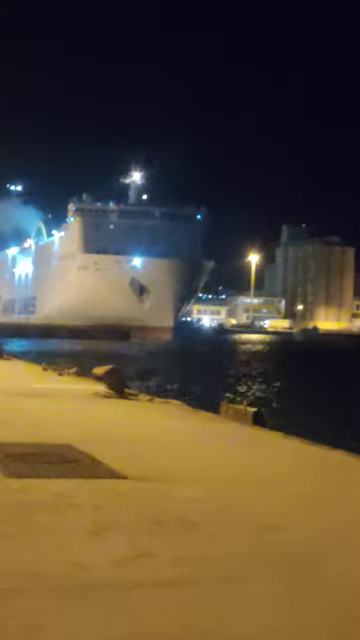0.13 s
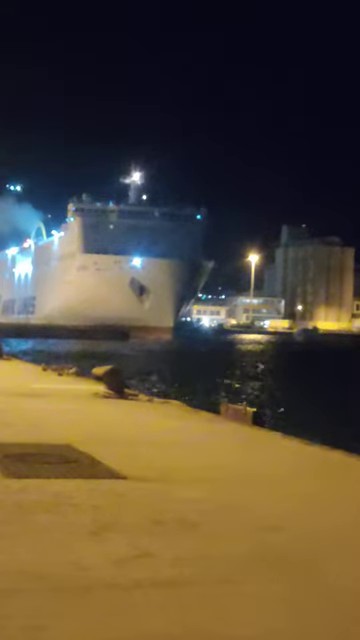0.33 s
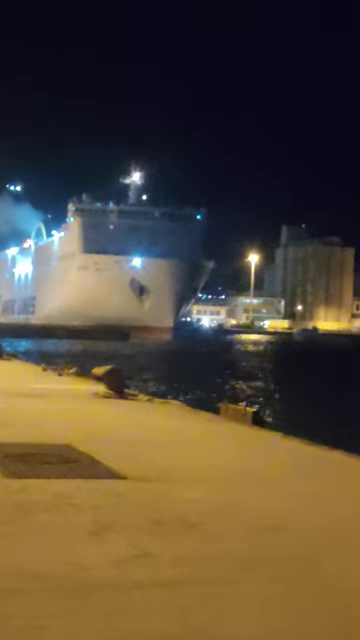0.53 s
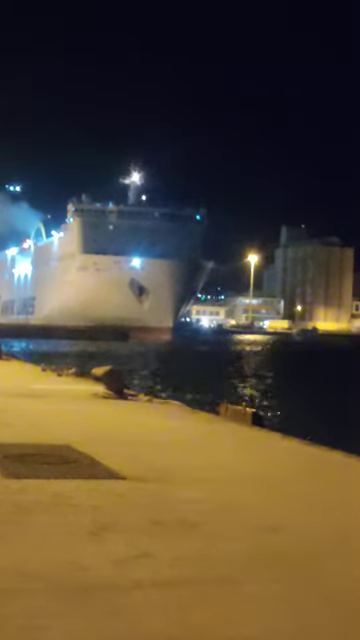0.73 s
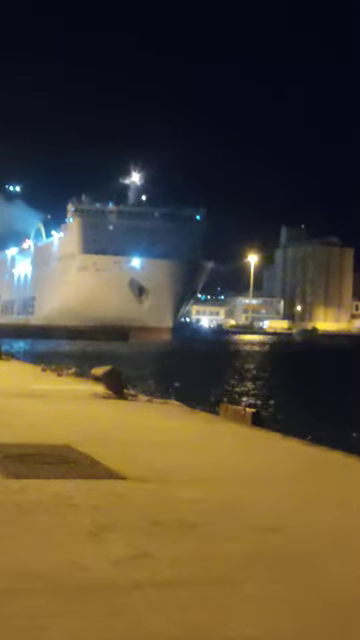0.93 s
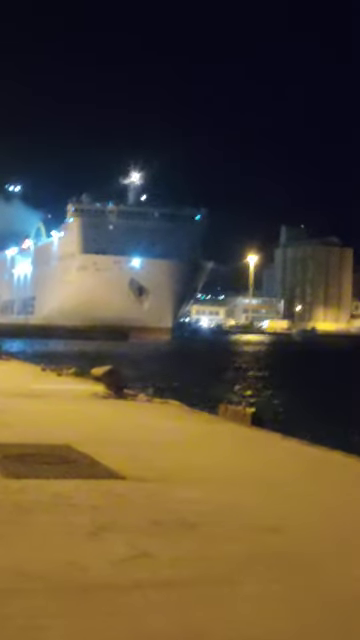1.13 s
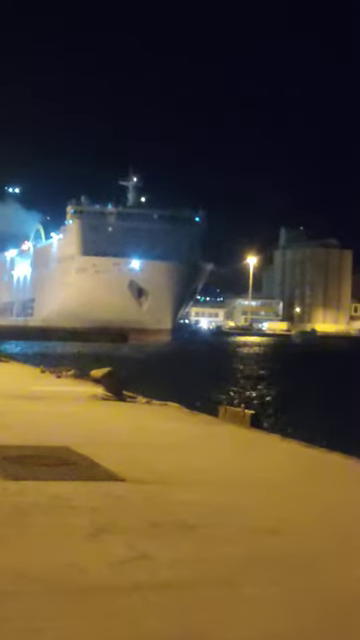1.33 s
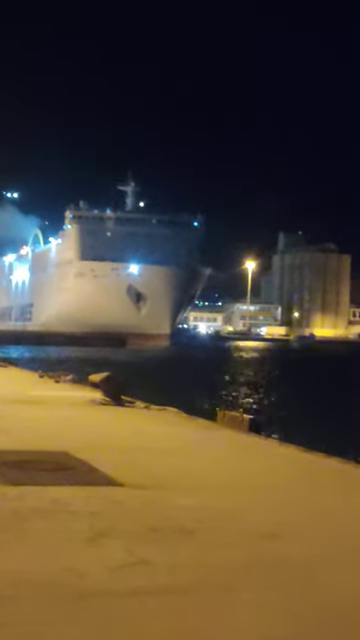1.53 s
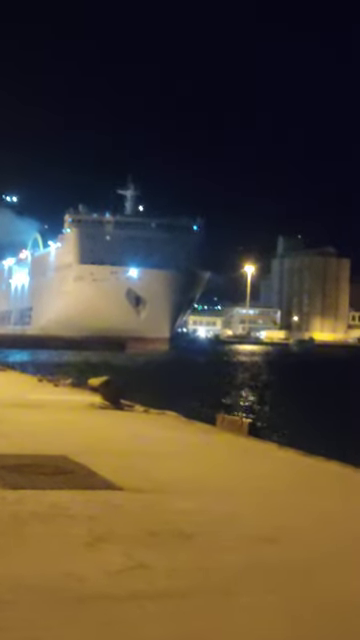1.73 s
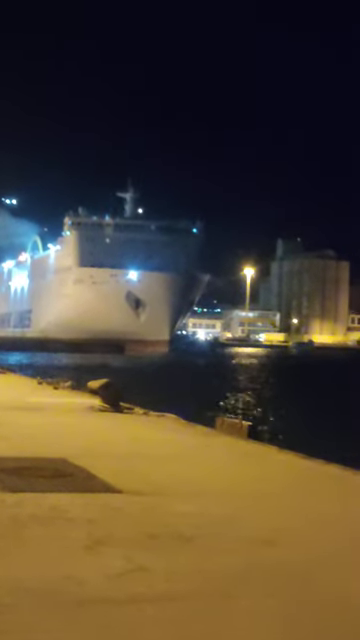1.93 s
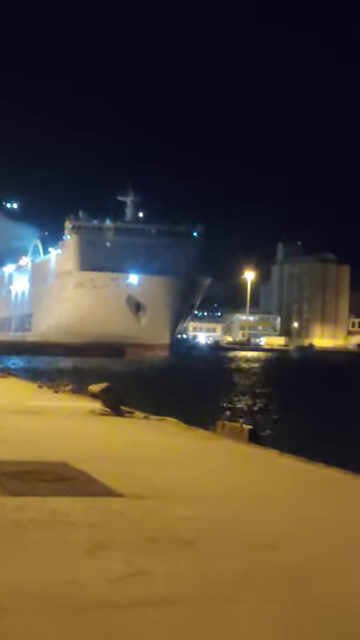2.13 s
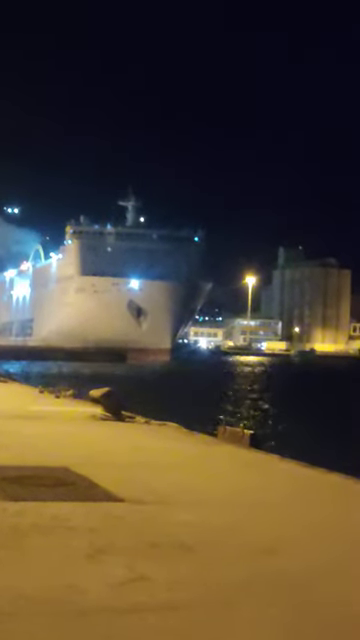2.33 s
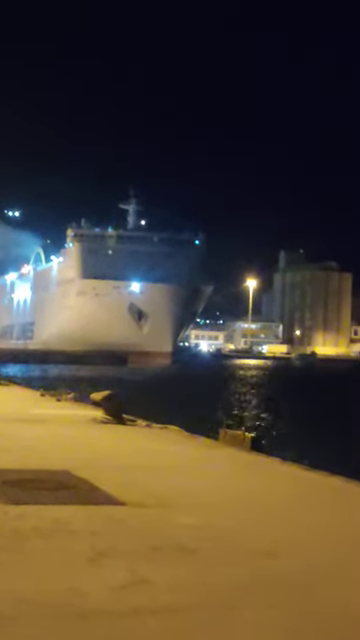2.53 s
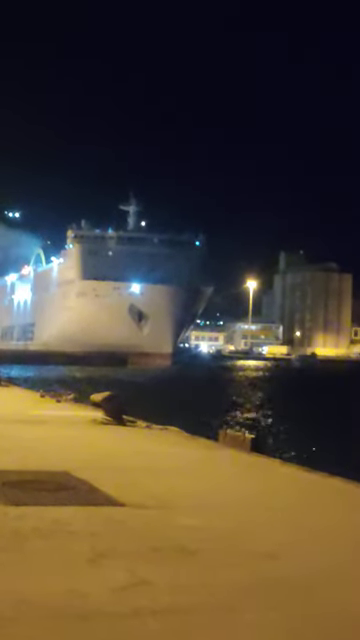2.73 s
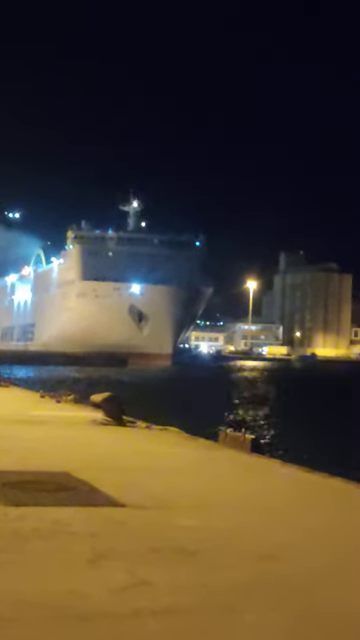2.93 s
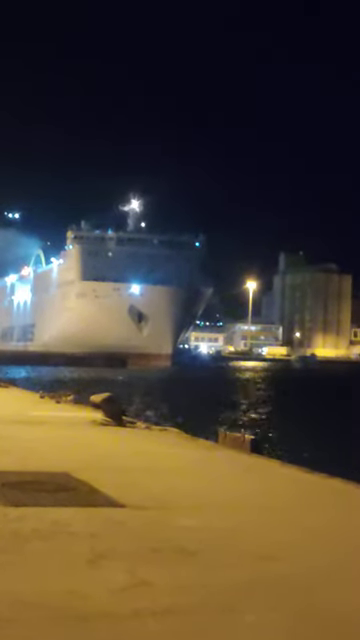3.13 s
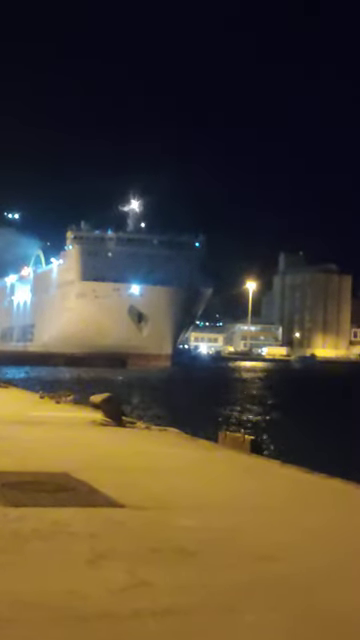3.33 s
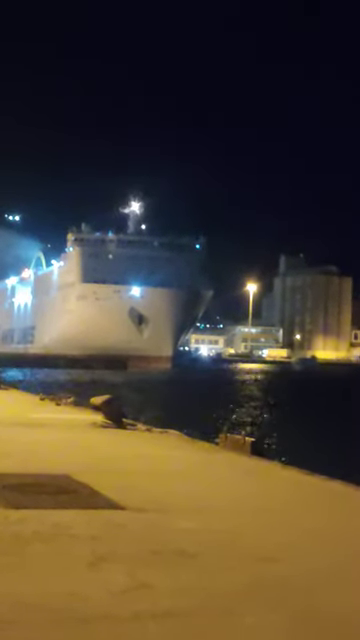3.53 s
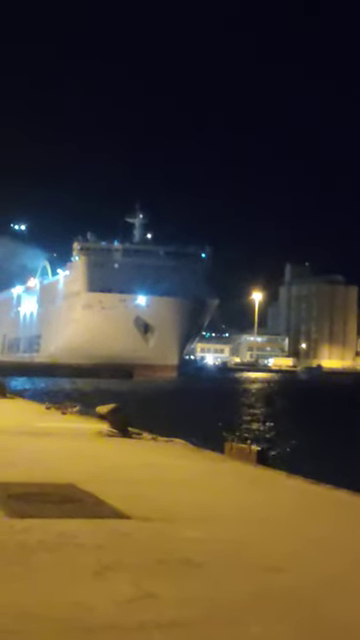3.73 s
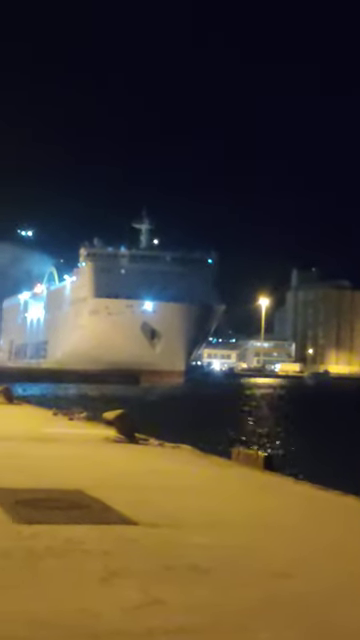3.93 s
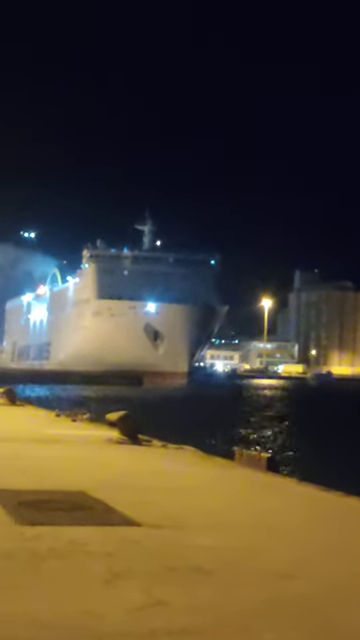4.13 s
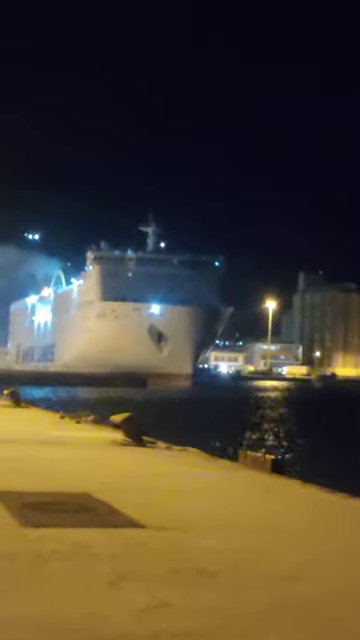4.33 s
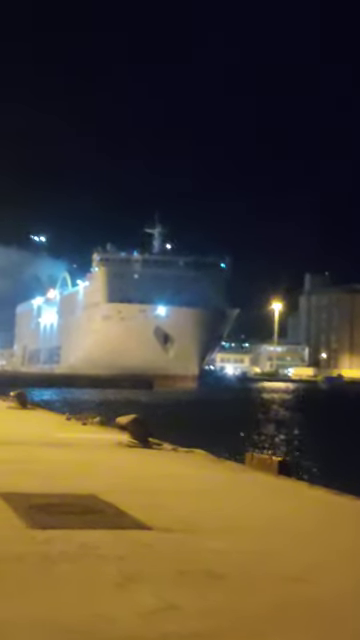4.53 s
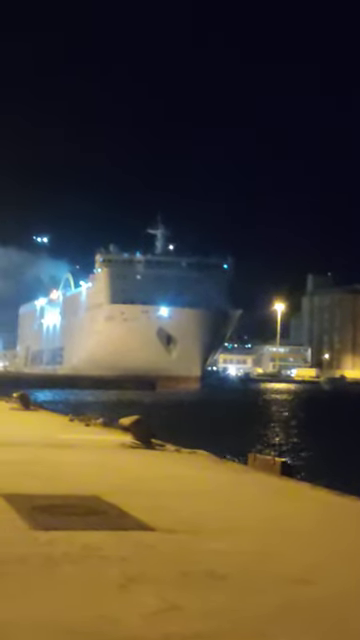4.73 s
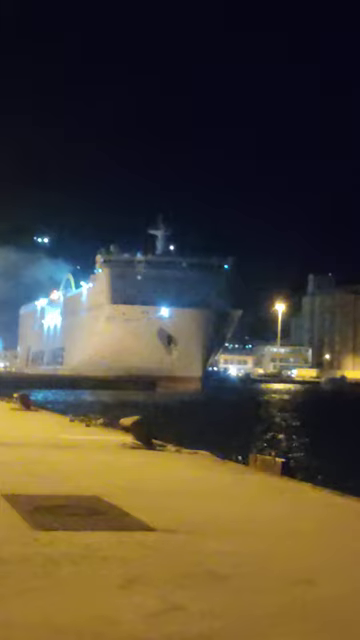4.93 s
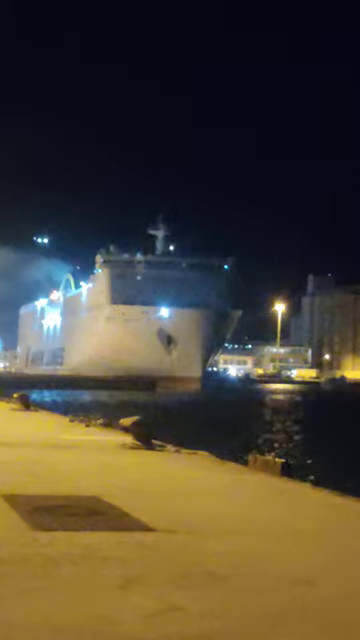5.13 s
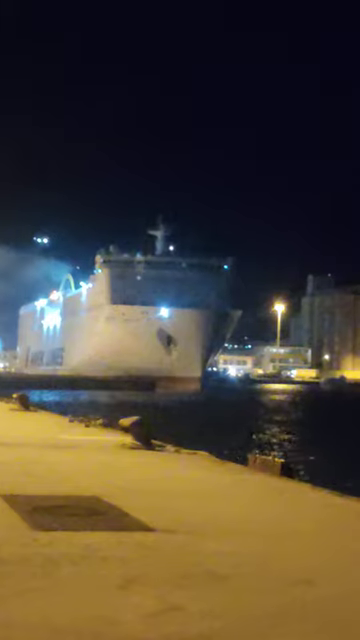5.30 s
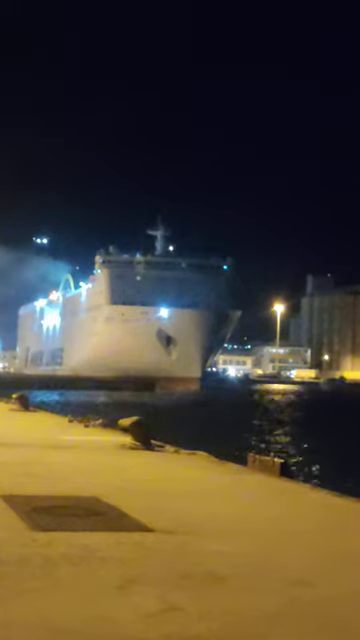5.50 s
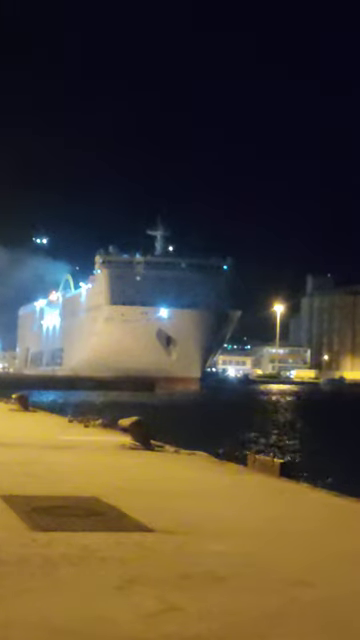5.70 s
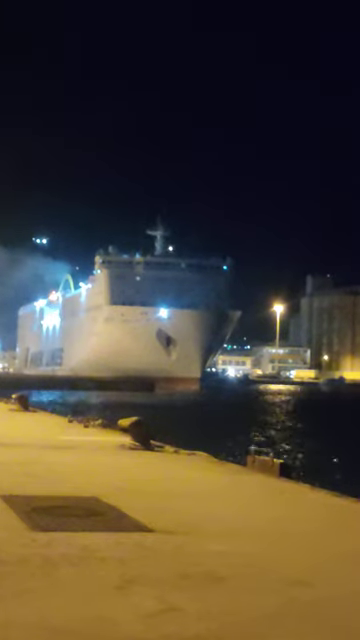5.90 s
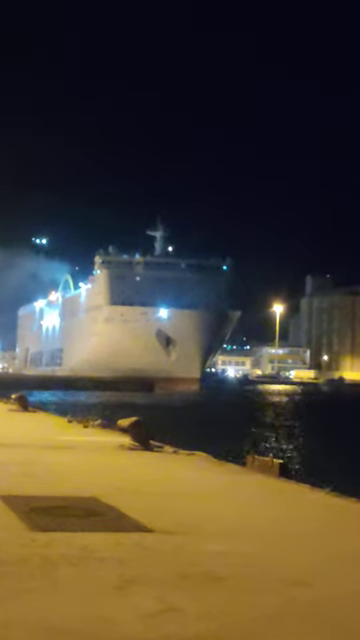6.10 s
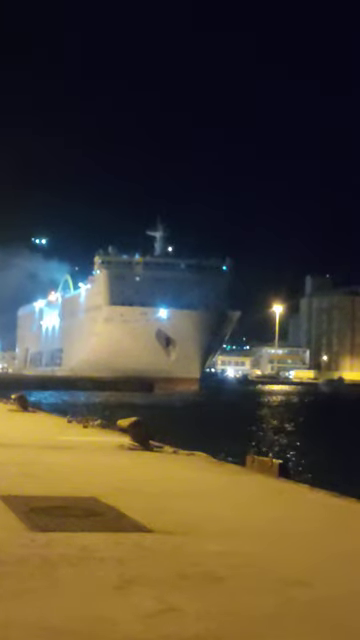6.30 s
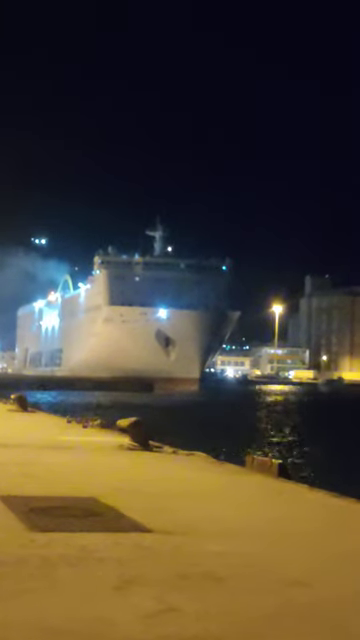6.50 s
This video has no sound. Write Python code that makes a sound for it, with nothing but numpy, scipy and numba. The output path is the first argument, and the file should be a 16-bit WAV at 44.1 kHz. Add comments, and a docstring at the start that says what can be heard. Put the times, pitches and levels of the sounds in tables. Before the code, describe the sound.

Over a steady low engine rumble at a quay, a ship's horn is already blaring, a deep note and a higher one together. It stops and rings back from around the harbour, then gives one short blast that also echoes. Between and after the blasts, small waves slap, plop and drip quietly, while gusts of wind rumble and puff on the microphone from either side.

```python
"""Two ferry horns sound together across the water, one deep, one higher: a long blast, then a short one.
Each is a stack of harmonics that waver in the moving air, with blown air pulsing through them.
Their lowest tones echo back from around the harbour. Underneath, engines rumble and small waves
wash, plop and drip at the quay, while wind gusts buffet the two microphone ports."""
import sys
import numpy as np
from numba import njit
from scipy import signal
from scipy.io import wavfile

SR = 44100
rng = np.random.default_rng(int(sys.argv[2]) if len(sys.argv) > 2 else 0)


def bounce(signal):
    """Save signal as a 16-bit WAV file at the path given by the first command-line argument."""
    frames = np.transpose(np.atleast_2d(signal))
    limited = np.clip(frames, -1, 1)
    pcm = np.round(limited * 32767).astype(np.int16)
    wavfile.write(sys.argv[1], SR, pcm)


N = 289119
STEP = 64   # samples per control step
T = np.arange(N // STEP + 2) * STEP / SR   # control times in seconds


def amp(db):
    """dB to gain."""
    return 10 ** (np.asarray(db) / 20)


def unit_rms(x):
    """Scale to rms 1."""
    return x / np.sqrt(np.mean(x ** 2) + 1e-20)


def butter(x, order, hz, kind="low"):
    """Butterworth filter."""
    return signal.sosfilt(signal.butter(order, hz, kind, fs=SR, output="sos"), x + 1e-18)


def in_time(*tables):
    """Turn timed rows into one control curve per column."""
    times, *columns = np.vstack(tables).T
    return [np.interp(T, times, column) for column in columns]


def at_hz(points, hz):
    """Read a curve on a log-frequency axis."""
    freqs, values = np.transpose(points)
    return np.interp(np.log(hz), np.log(freqs), values)


def per_sample(control):
    """Stretch control rows to one value per sample, by straight lines."""
    control = np.atleast_2d(control)
    lines = control[:, :-1, None] + np.diff(control)[:, :, None] * (np.arange(STEP) / STEP)
    return lines.reshape(len(control), -1)[:, :N]


def panned(pan_db):
    """Left and right gains with mean 1; pan is always left minus right in dB."""
    gains = amp(np.multiply.outer([.5, -.5], np.atleast_1d(pan_db)))
    return gains / gains.mean(axis=0)


def gate(on, off, rise, fall):
    """Opens over rise seconds, dies away from off with time constant fall."""
    return np.clip((T - on) / rise, 0, 1) * np.exp(-np.clip((T - off) / fall, 0, 25))


def swell(peak, held, rise, fall):
    """Grows towards its peak time, holds, dies away; rise and fall are time constants in seconds."""
    return np.exp(-np.clip((peak - T) / rise, 0, 25) - np.clip((T - peak - held) / fall, 0, 25))


def drift(rate_hz, channels=1):
    """Smooth random wander with spread 1."""
    pole = np.exp(-2 * np.pi * rate_hz * STEP / SR)
    white = rng.standard_normal((channels, len(T) + 1000))
    slow = signal.lfilter([1], [1, -2 * pole, pole * pole], white)[:, 1000:]
    return slow / slow.std(axis=1, keepdims=True)


def noise_bands(layers, likeness, flicker_db, lag_samples=5):
    """Half-octave noise bands that flicker on their own; each layer is (spectrum, stereo rms curves)."""
    edges = 30 * 2 ** np.arange(0, 8.6, .5)
    centres, widths = np.sqrt(edges[1:] * edges[:-1]), np.diff(edges)
    out, power = np.zeros((2, N)), 0
    for spectrum, level in layers:
        inside = (centres > spectrum[0][0] * .8) & (centres < spectrum[-1][0] * 1.2)
        share = amp(at_hz(spectrum, centres)) ** 2 * widths * inside
        power = power + np.multiply.outer(share / share.sum(), level ** 2)
    white = rng.standard_normal((2, 2, N))
    for k in np.flatnonzero(power.max(axis=(1, 2))):
        mid_side = butter(white[k % 2], 2, edges[k:k + 2], "band")
        alike = at_hz(likeness, centres[k])
        to_stereo = np.sqrt([1 + alike, 1 - alike]) * [[1, 1], [1, -1]]
        gain = np.sqrt(power[k] * SR / 4 / widths[k]) * amp(flicker_db * drift(9))
        band = per_sample(gain) * (to_stereo @ mid_side)
        if centres[k] > 3000:   # treble reaches the left port later
            band[0] = np.roll(band[0], lag_samples)
        out += band
    return out


def pings(events, cycles, glide, gain_db, attack=5.0):
    """Short sine bursts that slide in pitch as they die, upward for a positive glide."""
    out = np.zeros((2, N))
    for start, db, hz, pan in events:
        i = round(start * SR)
        turns = np.arange(min(int(4 * cycles / hz * SR), N - i)) / SR * hz
        shape = 2 * (1 - np.exp(-attack * turns)) * np.exp(-turns * 2 / cycles)
        tone = np.sin(2 * np.pi * turns * (1 + glide * turns / (4 * cycles)))
        out[:, i:i + len(turns)] += amp(db + gain_db) * panned(pan) * shape * tone
    return out


@njit(fastmath=True)
def add_sine(out, turn, level, phase, step):
    """Add a sine of turn radians per sample whose level and phase follow stereo control rows."""
    for c in range(2):
        for j in range((out.shape[1] - 1) // step + 1):
            if level[c, j] + level[c, j + 1] < 1e-5:
                continue
            z = np.exp(1j * (turn * j * step + phase[c, j]))
            spin = np.exp(1j * (turn + (phase[c, j + 1] - phase[c, j]) / step))
            slope = (level[c, j + 1] - level[c, j]) / step
            for i in range(min(step, out.shape[1] - j * step)):
                out[c, j * step + i] += (level[c, j] + slope * i) * z.imag
                z *= spin


# Tone of the engine and water bed, the wash and the fizz. Each row: frequency in Hz, density in dB.
BED_SPECTRUM = [(35, -12), (110, -10), (170, -4), (240, -11), (330, -12), (450, -18.5), (1150, -27),
                (2200, -36.5), (3640, -53), (5500, -54), (8300, -37), (9800, -52)]
WASH_SPECTRUM = [(500, -2), (1200, 0), (2500, -7), (4000, -20), (6000, -22)]
FIZZ_SPECTRUM = [(4500, -30), (6500, -16), (8200, 0), (9500, -7)]
# Stereo image of all three. Each row: frequency in Hz, left-right likeness (1 is mono).
HARBOUR_LIKENESS = [(60, .4), (160, .87), (1200, .8), (3400, .55), (6500, .45), (9400, .15)]
# Small waves slapping the quay. Each row: peak time and hold in seconds, wash in dB, fizz in dB.
WAVES = [(2.28, .07, -51, -59), (2.83, .02, -58, -62), (3.01, .19, -52, -60), (3.62, .02, -57, -62),
         (4.6, .05, -50, -57), (4.816, .01, -44, -53), (4.98, .04, -48, -49), (5.44, .02, -52, -62),
         (5.66, .015, -47, -54), (5.92, .12, -55, -63), (6.08, .05, -45, -54), (6.41, .02, -50, -55)]


def harbour(duck):
    """Engines rumble steadily; waves wash and fizz over a faint lapping, turned down by the duck gain."""
    waves = np.array([swell(peak, held, rise=.025, fall=.035) for peak, held, _, _ in WAVES])
    wash_db, fizz_db = np.transpose(WAVES)[2:]
    bed = amp(-39) * panned(2.2) * np.ones(len(T))
    wash = duck * (amp(-61) + amp(wash_db) @ waves) * panned(1.5)
    grain = amp(3.5 * drift(120, channels=2))
    fizz = duck * (amp(-68) + amp(fizz_db) @ waves) * grain * panned(3.0)
    layers = [(BED_SPECTRUM, bed), (WASH_SPECTRUM, wash), (FIZZ_SPECTRUM, fizz)]
    return noise_bands(layers, HARBOUR_LIKENESS, flicker_db=1.8)


# Single water sounds. Each row: start in seconds, relative level in dB, pitch in Hz, pan in dB.
PLOPS = [(3.008, -36, 837, 2.0), (4.948, -37, 810, 2.5), (5.049, -30, 977, 1.0), (5.655, -33, 1140, 1.5),
         (6.099, -34, 807, 1.0), (6.352, -42, 826, 1.0), (6.409, -39, 834, 2.5)]
DRIPS = [(2.8948, -46, 7120, 0.5), (3.0814, -45, 8520, -1.0), (3.2372, -29, 7900, 8.0),
         (3.4625, -43, 7290, -4.0), (3.6386, -44, 8340, 3.5), (4.6054, -42, 8450, 8.5),
         (4.6334, -40, 8470, 5.5), (5.1238, -44, 8210, 5.5), (5.5533, -46, 7640, 2.5),
         (5.6635, -36, 8050, 3.5), (5.9279, -44, 8610, 2.5), (5.9549, -41, 7390, -1.5)]


def plops_and_drips():
    """Hollow plops under the quay edge and tiny bright drips, each bending up in pitch."""
    plops = pings(PLOPS, cycles=5.0, glide=.1, gain_db=-1.5)
    return plops + pings(DRIPS, cycles=10.0, glide=.15, gain_db=-2.5, attack=.8)


# Gusts. Each row: peak time and hold in seconds, rumble in dB, flutter in dB, pan in dB.
GUSTS = [(0.0, .01, -33, -26, 2), (0.11, .07, -29, -28, 1), (0.27, .01, -29, -28, 10),
         (0.51, .02, -28, -34, 3), (0.64, .01, -35, -32, 9), (0.97, .01, -32, -31, 14),
         (1.04, .08, -25, -30, -11), (1.15, .02, -29, -24, -8), (1.22, .05, -31, -28, -8),
         (1.35, .13, -31, -30, 8), (1.8, .05, -29, -24, 3), (1.88, .08, -32, -29, 9),
         (2.17, .03, -25, -21, -5), (2.21, .025, -29, -22, 11), (2.375, .01, -28, -28, 22),
         (2.43, .06, -31, -29, 16), (2.57, .02, -35, -39, -8), (2.81, .01, -38, -31, 20),
         (3.07, .03, -36, -36, 8), (3.47, .04, -36, -26, 24), (3.56, .05, -33, -36, -8),
         (3.67, .05, -31, -31, -12), (3.83, .01, -33, -25, -2), (3.96, .02, -34, -36, 13),
         (4.16, .1, -30, -33, 2), (4.42, .04, -26, -26, 5), (4.58, .02, -34, -33, 9),
         (4.81, .035, -30, -28, 12), (4.93, .01, -36, -31, 19), (5.09, .01, -35, -36, 14),
         (5.18, .02, -35, -38, 12), (5.24, .015, -34, -30, -15), (5.42, .02, -35, -36, -8)]
# Sudden puffs. Each row: start in seconds, relative level in dB, pitch in Hz, pan in dB.
PUFFS = [(2.3705, -12, 430, 15.0), (2.799, -21, 258, 12.0), (3.063, -23, 202, 7.5), (3.472, -15, 290, 23.5),
         (3.502, -10, 520, 22.0), (3.678, -20, 320, -10.0), (3.722, -21, 221, -8.0),
         (4.783, -16, 275, 22.5), (4.798, -16, 340, 15.0), (4.82, -16, 430, 15.0), (4.893, -22, 260, 14.0),
         (4.927, -20, 330, 15.0), (5.076, -23, 215, 15.0), (5.213, -24, 245, -9.5), (5.411, -26, 202, -6.0)]


def wind():
    """Turbulence at each port on its own: a lumpy rumble, a flutter above it, and dull single puffs."""
    rumble_gain, flutter_gain = amp(-41.5) * panned(1.5), amp(-44) * panned(1.5)   # constant breeze
    for peak, held, rumble_db, flutter_db, pan in GUSTS:
        gust = swell(peak, held, rise=.016, fall=.024) * panned(pan)
        rumble_gain = rumble_gain + amp(rumble_db) * gust
        flutter_gain = flutter_gain + amp(flutter_db) * gust
    white = rng.standard_normal((2, 2, N))
    rumble = unit_rms(butter(white[0], 2, [22, 150], "band"))
    flutter = butter(white[1], 1, [190, 330], "band")
    flutter = unit_rms(butter(flutter, 4, 580))
    rumble *= per_sample(rumble_gain * amp(2.2 * drift(12, channels=2)))
    flutter *= per_sample(flutter_gain * amp(4.0 * drift(35, channels=2)))
    puffs = pings(PUFFS, cycles=2.2, glide=-.45, gain_db=3.5, attack=1.3)
    return rumble + flutter + butter(puffs, 2, 1100)


# The high horn's echo, one list per blast. Each row: time in seconds, fundamental in dB, octave in dB.
ECHOES = [
    [(2.2, -44, -28), (2.29, -33, -29), (2.49, -29, -34), (2.69, -32, -35), (2.95, -28.5, -34),
     (3.42, -27, -38.5), (3.6, -26, -41), (3.84, -29, -37)],
    [(4.56, -31, -31), (4.73, -33, -37), (4.81, -44, -52), (5.03, -46, -38), (5.07, -36, -43),
     (5.2, -42, -42), (5.31, -34, -50), (5.5, -42, -48), (5.64, -46, -50), (5.75, -37, -41),
     (5.99, -30, -43), (6.27, -33, -54), (6.39, -52, -44)],
]
# Brief dips in that echo. Each row: time in seconds, depth in dB.
ECHO_DIPS = [(2.538, 16), (3.5, 26)]


def echo_gains(closes):
    """Far walls answer: the fundamental swells and ebbs, the octave dies away unevenly, the rest fade."""
    upper_db, fade_db_per_s = -46, [12, 48]   # from when the valves close; slower after the long blast
    fundamental_db, octave_db = in_time(*ECHOES)
    dip = sum(db * swell(time, 0, rise=.02, fall=.02) for time, db in ECHO_DIPS)
    blast = np.maximum(np.searchsorted(closes, T) - 1, 0)
    fade = np.take(fade_db_per_s, blast) * np.maximum(T - closes[blast], 0)
    waver = 1.8 * drift(7.0, channels=3)   # paths of different length beat against each other
    return amp(np.array([fundamental_db - dip, octave_db - dip, upper_db - fade]) + waver)


HIGH_HZ, DEEP_HZ = 164.7, 64.7   # the horns' pitches
# Tone of the blown air and of the rasp on top. Each row: frequency in Hz, density in dB.
AIR_SPECTRUM = [(300, -26), (500, -13), (750, -3), (1050, -2), (1300, -13), (2000, -8), (2800, -9)]
RASP_SPECTRUM = [(3200, -1), (4500, 1), (6000, .5), (7800, -6), (9500, -18)]
# Stereo image of both. Each row: frequency in Hz, left-right likeness.
AIR_LIKENESS = [(140, .87), (750, .75), (1740, .5), (4000, .5), (6500, .45), (9400, .15)]


def blown_air(air_gain, rasp_gain):
    """Air rushes and rasps out of the horns in pulses at both pitches."""
    air = noise_bands([(AIR_SPECTRUM, air_gain * panned(1.2))], AIR_LIKENESS, flicker_db=2.0)
    air = butter(air, 8, 2880)   # the bell passes little above this
    rasp = noise_bands([(RASP_SPECTRUM, rasp_gain * panned(-2.5))], AIR_LIKENESS, flicker_db=2.0)
    turn = 2 * np.pi * np.arange(N) / SR
    pulses = 1 + .25 * np.cos(HIGH_HZ * turn) + .3 * np.cos(DEEP_HZ * turn)
    return (air + rasp) * pulses


def wavering_tones(tones, shimmer=.085, fading=.23, apart=.25):
    """Play (Hz, harmonic, stereo gain) tones; moving air makes them waver, the higher the more."""
    out = np.zeros((2, N))
    for hz, harmonic, gain in tones:
        depth, rough = np.sqrt(hz / 1000), shimmer * (hz / 1000) ** 1.1
        slow, fast, path = drift(1.5, channels=2), drift(14, channels=2), drift(2.5, channels=2)
        level = np.sqrt(2) * np.exp(depth * (fading * slow[0] + apart * .45 * path) + rough * fast[0])
        phase = .05 * harmonic ** 2 + depth * 2.2 * fading * slow[1] + 2.5 * rough * fast[1]
        # the two ports hear a slightly different path
        spread = apart * depth ** 2 * path[0] - .13 + .3 * np.sin(hz / 230)
        add_sine(out, 2 * np.pi * hz / SR, gain * level, phase + spread * [[1], [-1]], STEP)
    return out


# Valve cues, a row per blast; the first is already sounding at 0. Each row, in seconds: deep horn
# opens, it drops to its held pitch, high horn opens, both close.
VALVES = [(-1, -1, -1, 2.187), (3.753, 3.805, 3.853, 4.542)]
# Level rides, one list per blast. Each row: time in seconds, then relative levels in dB of the high
# horn's fundamental, octave and third harmonic, and of both horns' mids, treble and rasp.
BLASTS = [
    [(0.0, -17, -18, -27, -25.5, -24, -40), (0.36, -14.5, -21, -27, -22.5, -23, -36),
     (0.62, -14, -21.5, -24, -22, -24, -38.5), (0.71, -14, -22, -23, -21.5, -23, -34.5),
     (0.92, -18, -20.5, -23, -21, -24, -38.5), (1.12, -26, -18.5, -26, -21, -25, -39.5),
     (1.19, -22, -20, -27.5, -21, -28, -41), (1.24, -22.5, -20, -30, -22, -25, -34.5),
     (1.47, -17, -19.5, -32, -23, -31.5, -44), (1.69, -16, -20, -26, -22, -28, -41.5),
     (1.94, -24, -23, -32, -26, -24, -40.5), (2.14, -23, -19.5, -29.5, -25, -27, -38.5),
     (2.185, -25, -22, -32, -28, -31, -41)],
    [(3.87, -21, -17, -24, -24.5, -25.5, -38.5), (3.97, -17, -17, -21.5, -26, -27, -41.5),
     (4.11, -16, -19, -21.5, -23, -28, -42.5), (4.3, -16, -21, -22, -24.5, -30, -46),
     (4.5, -18, -19.5, -24, -24, -30, -43.5)],
]
# Timbre of each horn. Each row: harmonic number, relative level in dB.
HIGH_HARMONICS = [(4, 0), (5, 0), (6, -5), (7, -5), (8, -14), (9, -15), (10, -17), (11, -15), (12, -18),
                  (13, -18), (14, -22), (15, -22), (16, -22), (17, -24), (18, -38), (19, -37), (20, -36)]
DEEP_HARMONICS = [(3, -1), (4, -16), (5, -12), (6, -4), (7, -19), (8, -6), (9, -6), (10, -17), (11, 0),
                  (12, -7), (13, -14), (14, -8), (15, -8), (16, -8), (17, -7), (18, -16)]
# The deep horn's top end. Each row: frequency in Hz, relative level in dB.
DEEP_TOP = [(1200, -25), (1450, -23), (1650, -19), (2000, -22), (2750, -23), (2900, -36), (3300, -42)]
# The blare that opens the short blast. Each row: frequency in Hz, dB over the held tone.
OPENING_BLARE = [(194, 1), (390, -3), (580, 10), (780, 6), (970, 5), (1165, 14), (1400, 10), (1700, 4),
                 (2100, 10), (2800, 7)]
# Where the harmonics sit. Each row: frequency in Hz, pan in dB.
HORN_PAN = [(60, 1.0), (95, 1.0), (150, 4.0), (240, 3.0), (380, 2.5), (600, -2.0), (940, 2.5), (1500, -0.5),
            (2370, 0.5), (3750, -1.5), (5930, -3.0), (9390, -2.5)]


def horns():
    """Valves let air through two horns; returns their sound with its echoes, and a 0-1 blowing gate."""
    fundamental_db, octave_db, third_db, mids_db, treble_db, rasp_db = in_time(*BLASTS)
    echo_fundamental, echo_octave, echo_upper = echo_gains(closes=np.array(VALVES)[:, -1])
    high_on = sum(gate(high, off, .012, .012) for _, _, high, off in VALVES)
    deep_on = sum(gate(drop, off, .03, .011) for _, drop, _, off in VALVES)
    blowing = sum(gate(on, off, .03, .011) for on, _, _, off in VALVES)
    overblown = gate(*VALVES[1][:2], .025, .015)   # the deep horn starts on its third mode alone
    tail = echo_upper * (1 - blowing)
    fundamental = amp(fundamental_db) * high_on + echo_fundamental * (1 - high_on)
    octave = amp(octave_db) * high_on + echo_octave * (1 - high_on)
    third = amp(third_db) * high_on + tail
    tones = [(HIGH_HZ, 1, fundamental * panned(3.8 + drift(2.0)[0])),
             (2 * HIGH_HZ, 2, octave * panned(3.0)),
             (3 * HIGH_HZ, 3, third * panned(-2.2))]
    deep_harmonics = DEEP_HARMONICS + [(k, at_hz(DEEP_TOP, k * DEEP_HZ)) for k in range(19, 49)]
    voices = [(HIGH_HZ, HIGH_HARMONICS, mids_db, high_on, 0),
              (DEEP_HZ, deep_harmonics, mids_db - 4, deep_on, overblown)]
    for pitch_hz, harmonics, body_db, held, opening in voices:
        for k, db in harmonics:
            hz = k * pitch_hz
            blare = opening * (k % 3 == 0) * amp(at_hz(OPENING_BLARE, hz))
            direct = amp(body_db if hz < 1200 else treble_db + 5) * (held + blare)
            echo = tail * amp(-4.0 * np.log2(hz / 600)) * (hz < 1400)   # distance dulls the echo
            tones.append((hz, k, amp(db) * (direct + echo) * panned(at_hz(HORN_PAN, hz))))
    chord = wavering_tones(tones)
    air = blown_air(blowing * amp(treble_db - 2.3), blowing * amp(rasp_db + 3.0 * overblown))
    return chord + air, blowing


def scene():
    """Horns over harbour and wind; the waves duck out under each blast."""
    blasts, blowing = horns()
    return blasts + harbour(duck=1 - blowing) + plops_and_drips() + wind()


def record(dry):
    """Round off the peaks, then cut the top end steeply."""
    rounded = 1.4 * np.tanh(dry / 1.4)
    stopband_hz = 10395
    return signal.sosfilt(signal.cheby2(12, 60, stopband_hz, fs=SR, output="sos"), rounded)


dry = scene()
out = record(dry)
bounce(out)
```